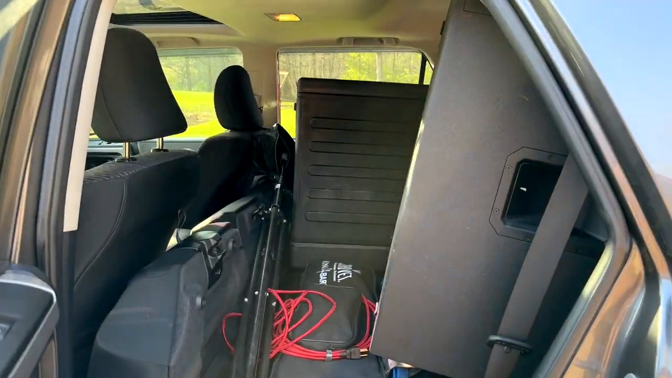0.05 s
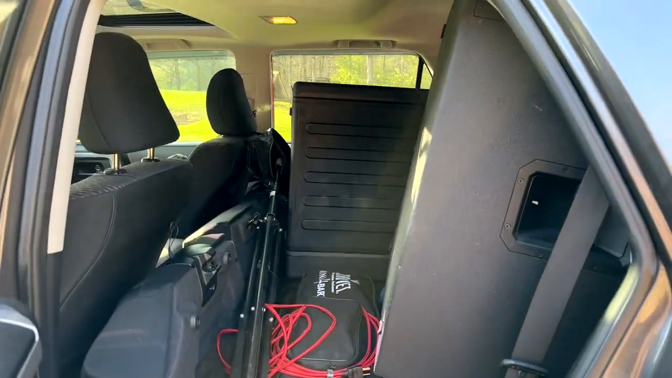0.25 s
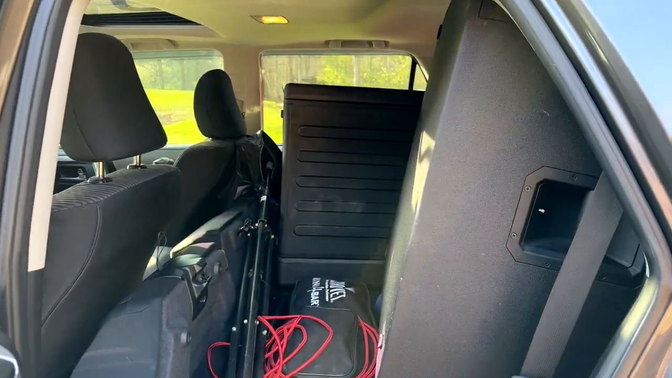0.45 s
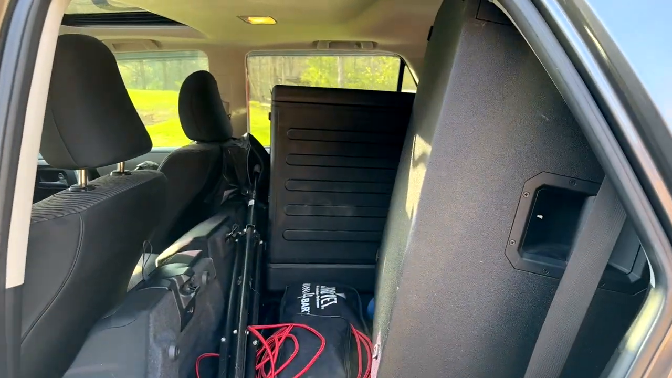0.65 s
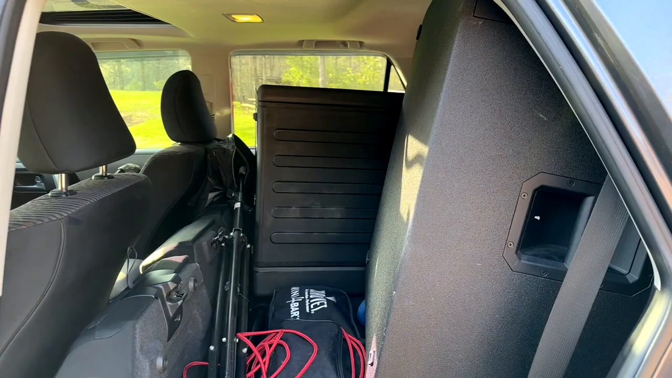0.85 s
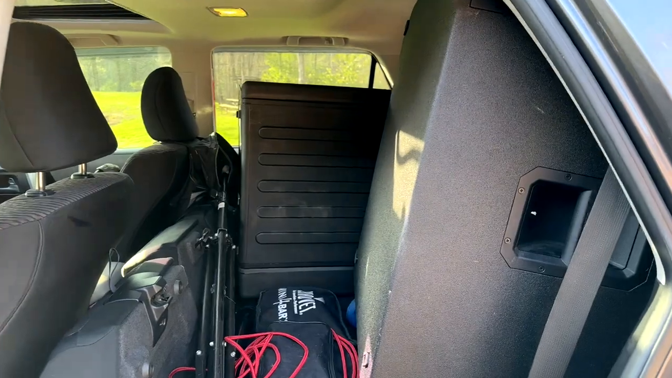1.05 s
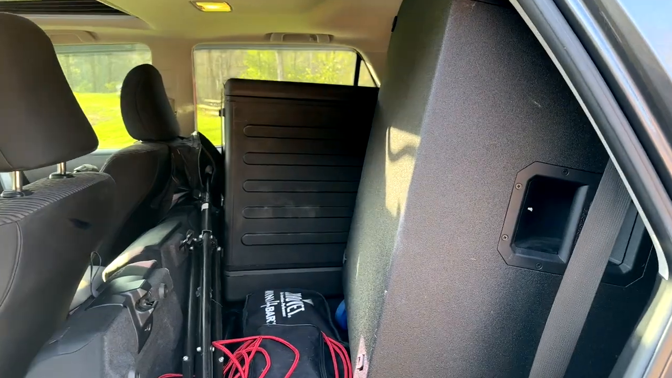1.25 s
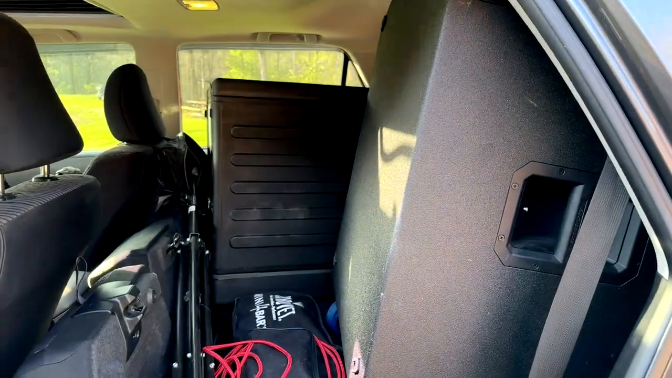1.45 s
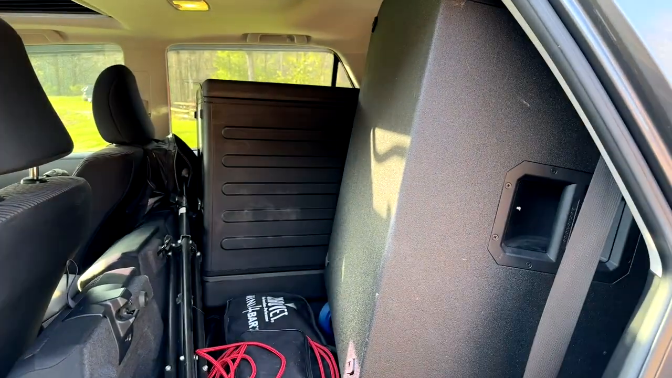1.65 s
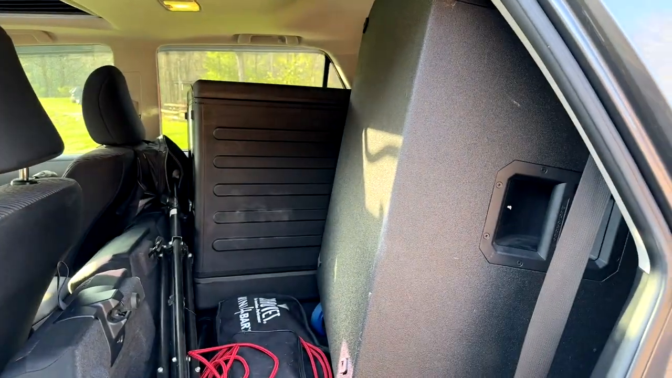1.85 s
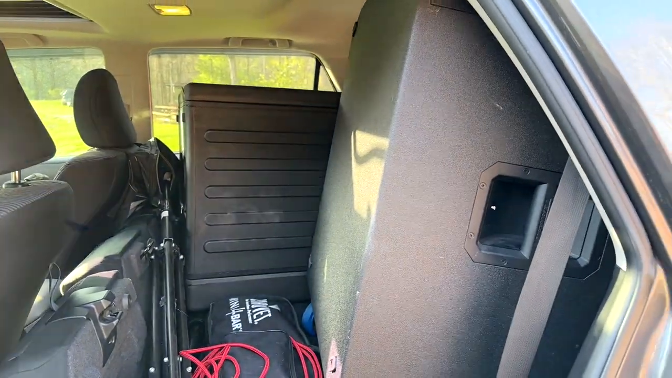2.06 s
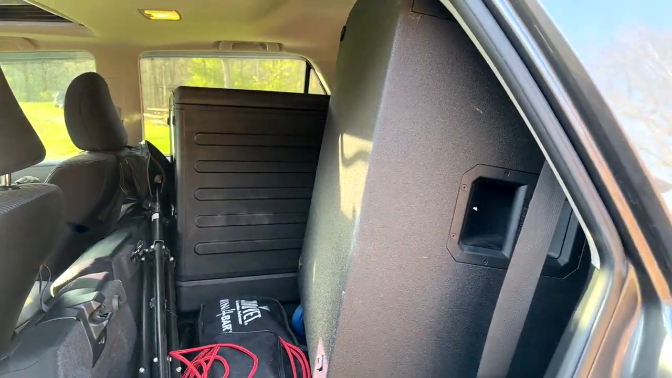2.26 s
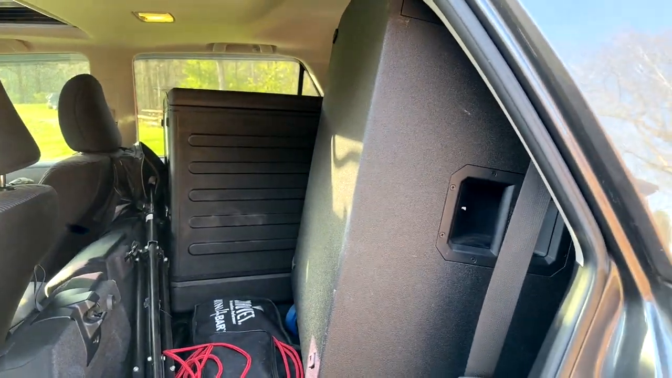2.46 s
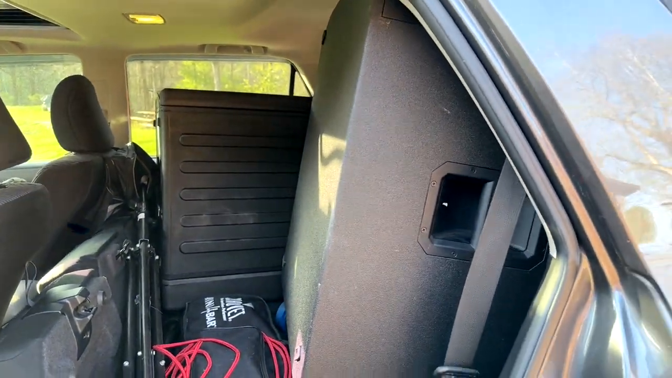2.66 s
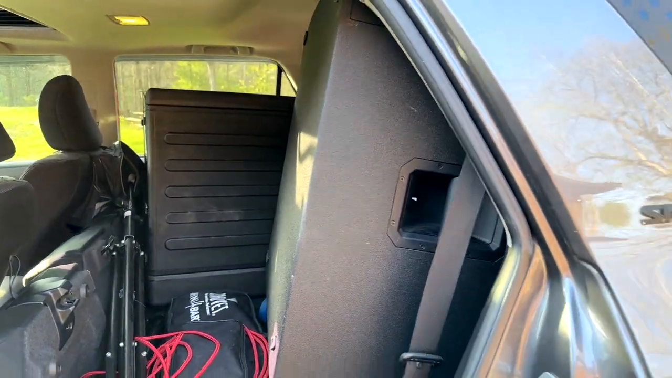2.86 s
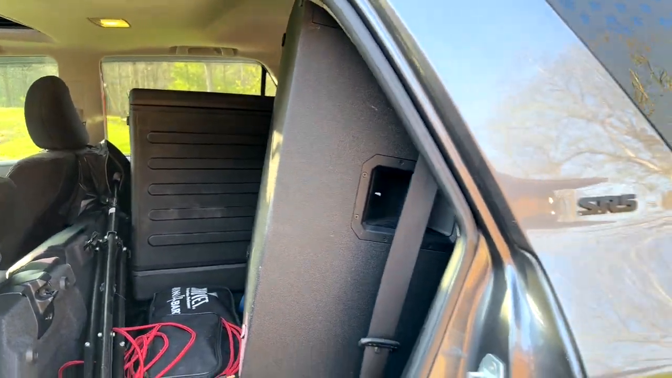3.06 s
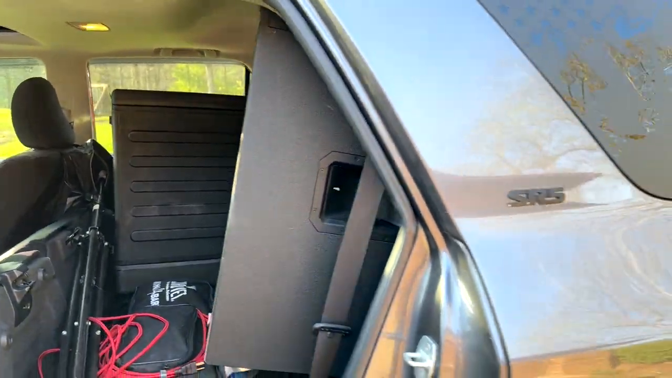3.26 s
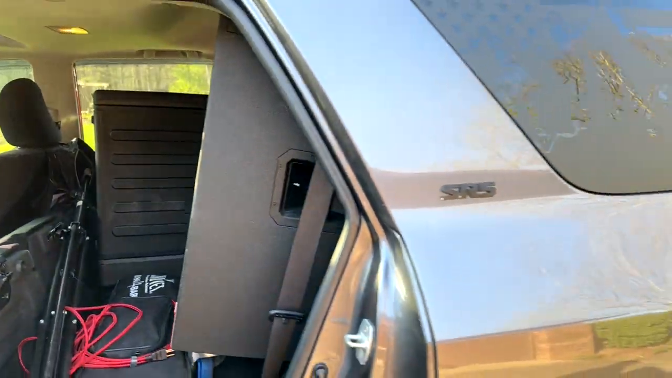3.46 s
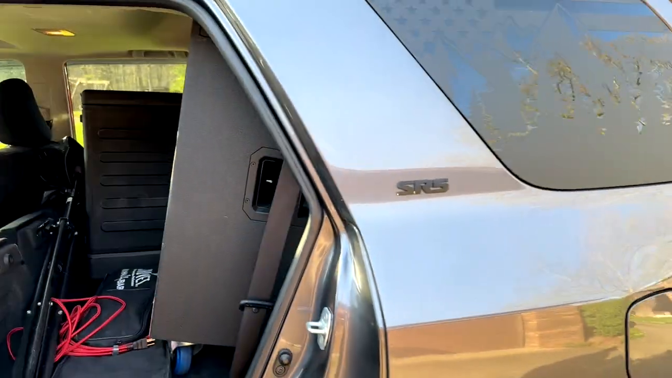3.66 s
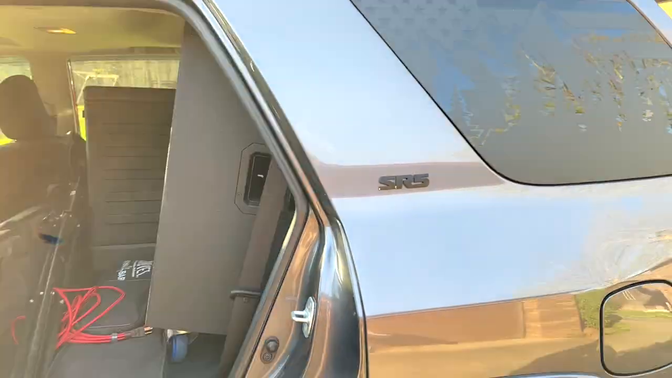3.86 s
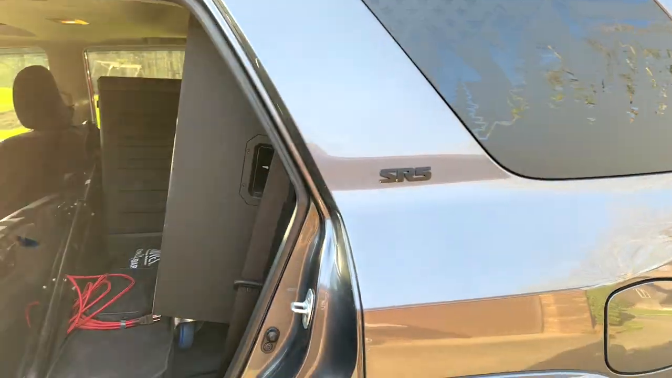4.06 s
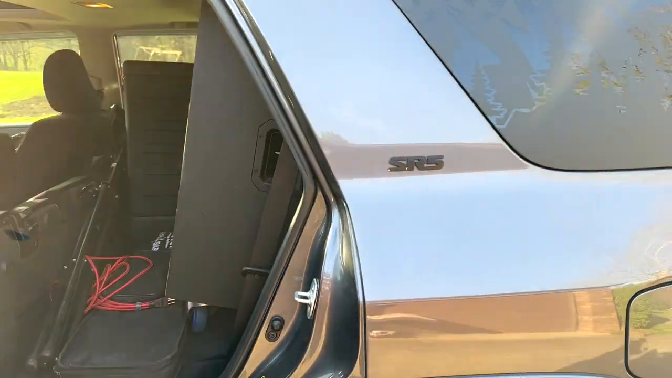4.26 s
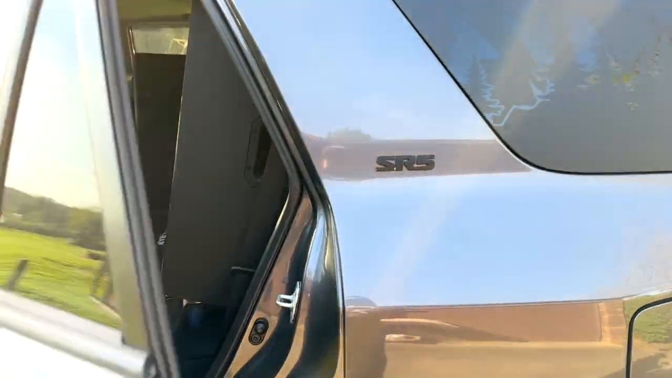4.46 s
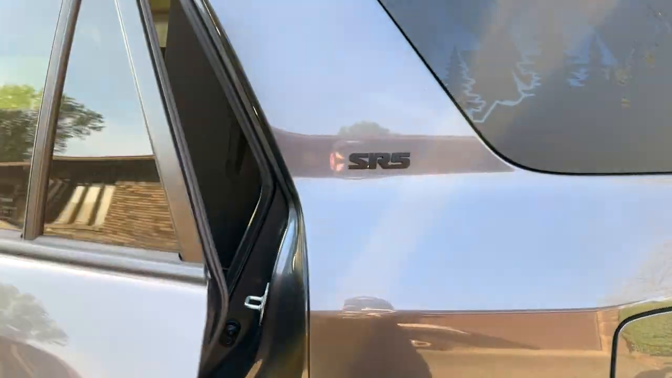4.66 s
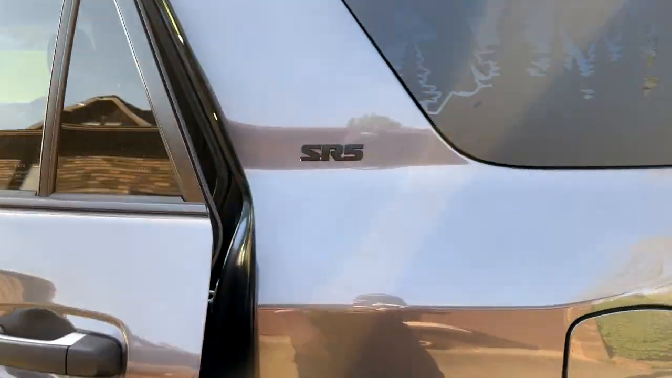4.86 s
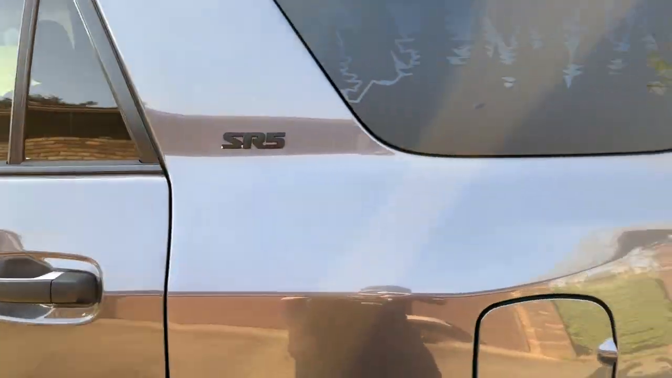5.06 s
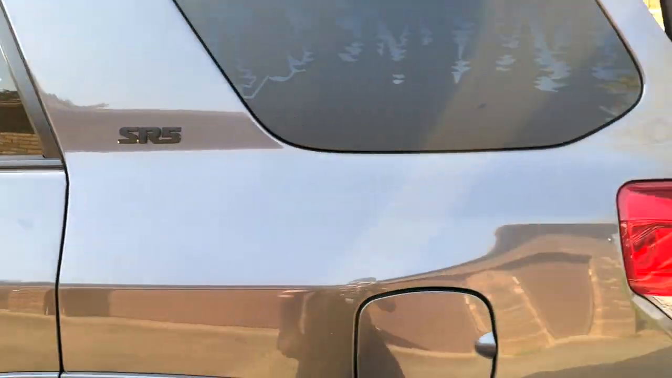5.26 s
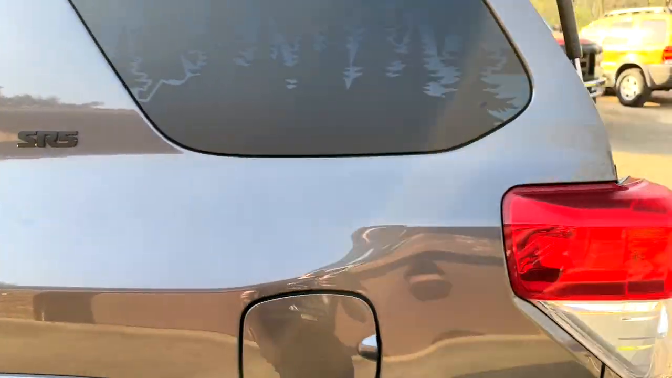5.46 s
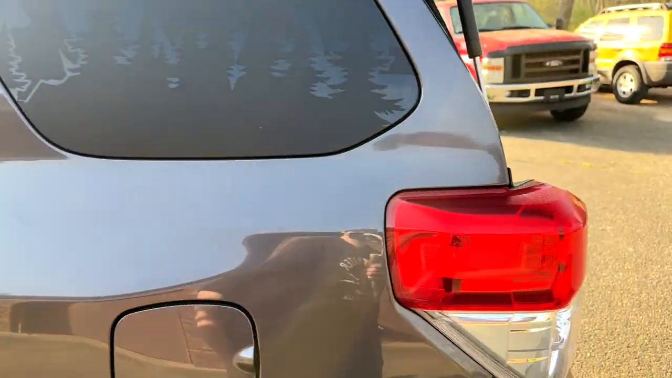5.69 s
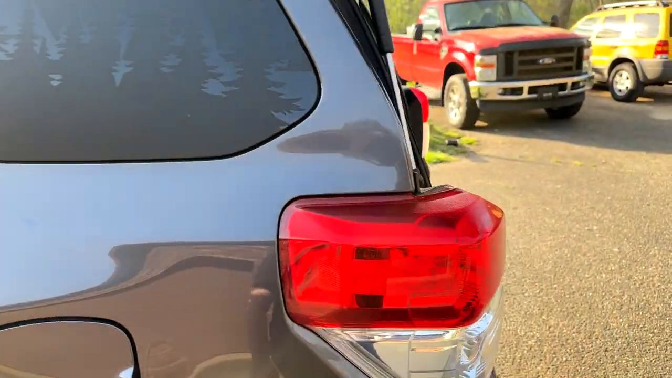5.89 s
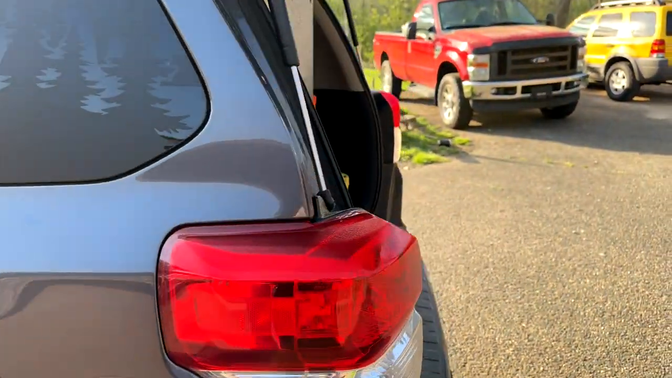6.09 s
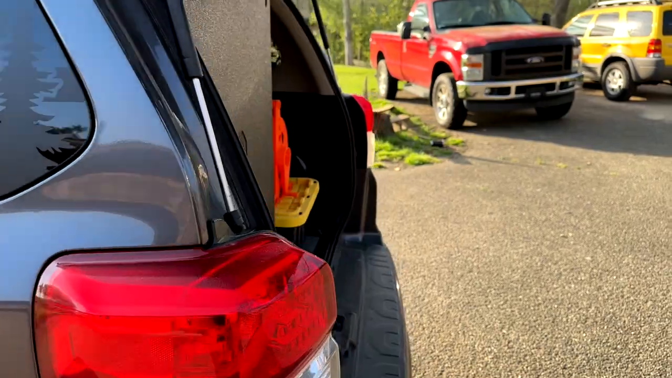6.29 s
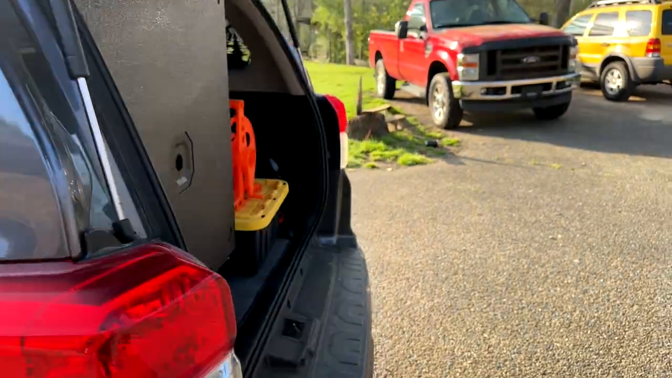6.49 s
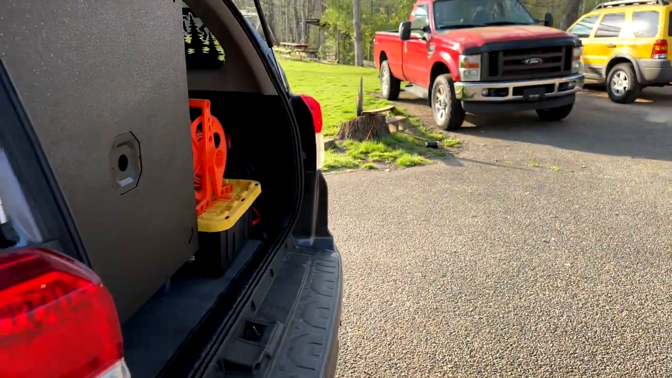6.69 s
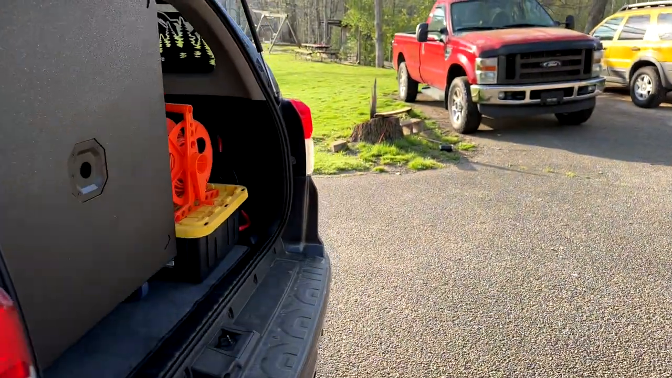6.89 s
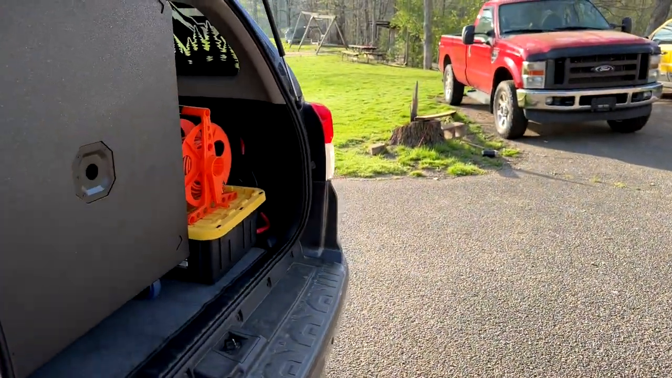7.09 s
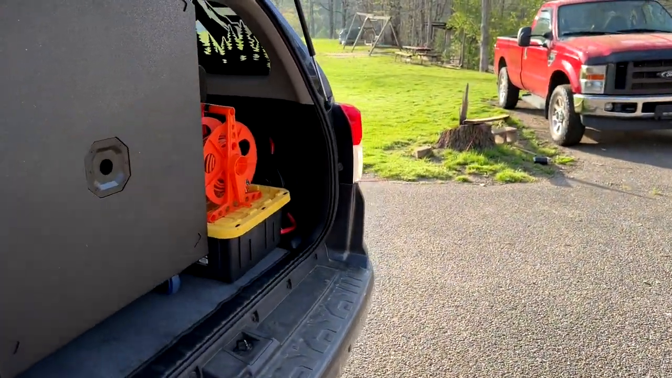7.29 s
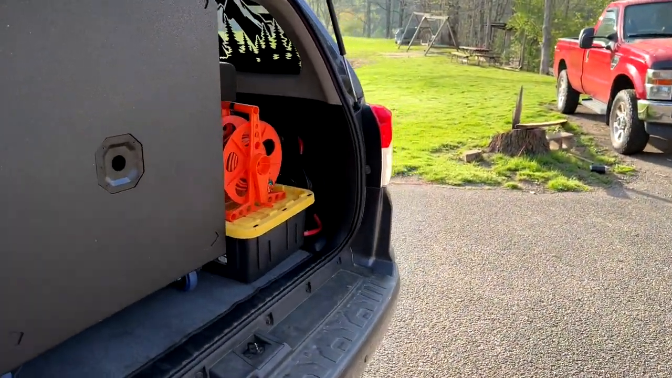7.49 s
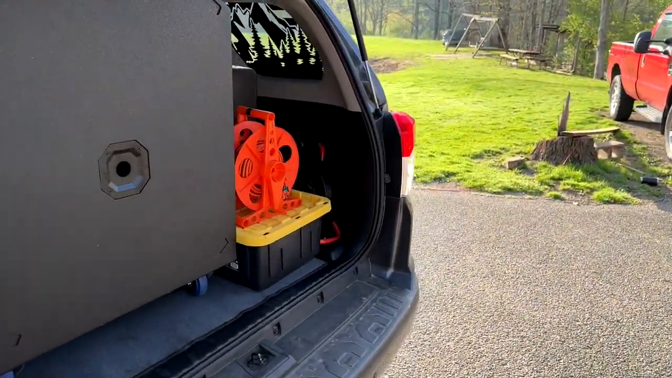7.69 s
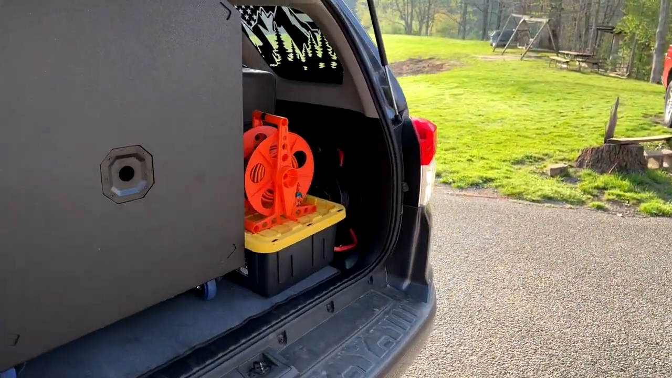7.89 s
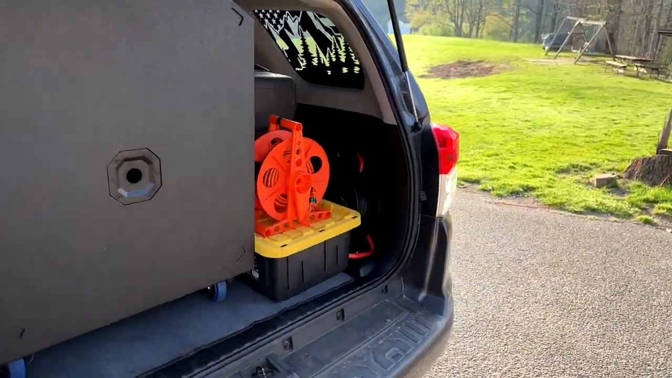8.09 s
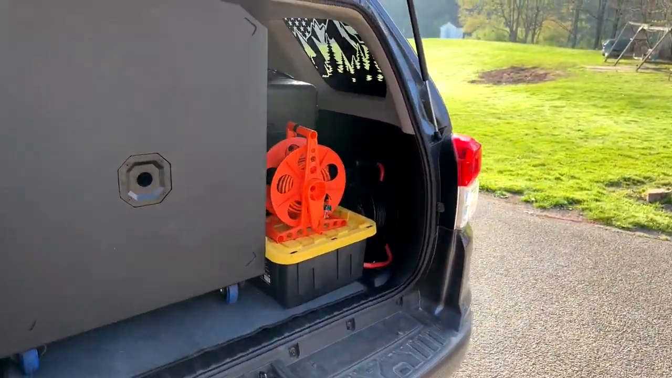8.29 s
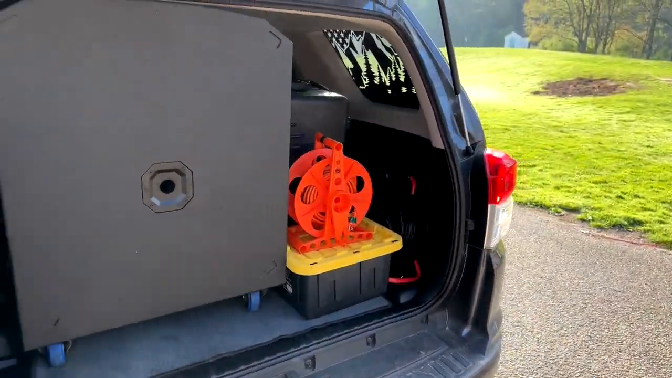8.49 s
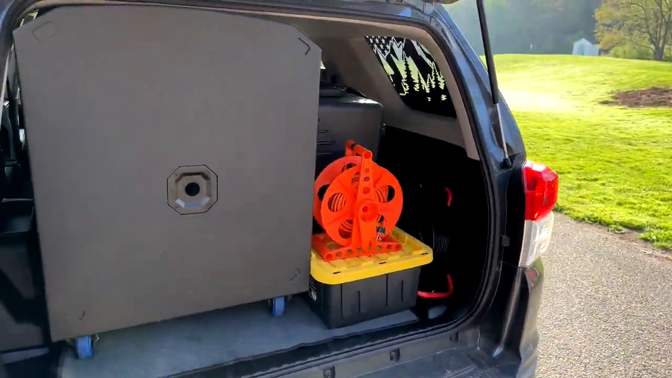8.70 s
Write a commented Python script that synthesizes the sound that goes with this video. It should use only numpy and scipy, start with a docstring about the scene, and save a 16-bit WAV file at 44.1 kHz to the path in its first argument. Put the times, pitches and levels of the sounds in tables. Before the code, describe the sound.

Close hand-held phone pickup outdoors. Faint distant birds, low hum and soft hiss come first, with sparse shoe scuffs and small ticks. A rapid down-slurred trill runs up to and just past a single loud car door slam, whose quick cluster of latch clicks and panel knocks lands with a bassy thump and short ring. Then gritty steps, fabric rustle and thin far whistles fill the quiet.

```python
"""On a driveway, a heavy car door is pushed shut an arm's length from a hand-held phone.
Nine blows on latch, frame and seals ring the panels as fading sine waves, and the cabin air booms.
Shoes scuff, tick and thud on gritty asphalt, and clothes swish, made from short or swelling noise.
Birds trill, call and whistle as unsteady tones with harmonics, blurred by reflections.
Behind them lie a distant rumble with hiss, a low hum, a drone and a faint whine."""
import sys
import numpy as np
from scipy import signal
from scipy.fft import irfft
from scipy.io import wavfile
from scipy.ndimage import map_coordinates

SR = 44100
rng = np.random.default_rng(int(sys.argv[2]) if len(sys.argv) > 2 else 0)


def int16_out(signal):
    """Quantize to a 16-bit WAV file."""
    q = np.round(np.clip(np.atleast_2d(signal).T, -1, 1) * 32767)
    wavfile.write(sys.argv[1], SR, q.astype(np.int16))


N = 385434
TIME = np.arange(N) / SR


def undb(db):
    """Turn decibels into a plain gain."""
    return 10 ** (np.asarray(db) / 20)


def unit(x):
    """Scale a sound to an average (rms) strength of 1."""
    return x / np.sqrt(np.mean(x ** 2))


def colour(points, hz):
    """Read the gain at each frequency from an outline of (pitch_hz, level_db) points."""
    point_hz, point_db = np.transpose(points)
    return undb(np.interp(np.log(hz + 1), np.log(point_hz), point_db))


def noise(points, size, width_hz=1700):
    """Coloured stereo noise of rms 1; the channels are alike in the bass and part in the treble."""
    hz = np.fft.rfftfreq(size, 1 / SR)
    mid, side = np.exp(2j * np.pi * rng.random((2, len(hz))))
    side = side * 0.89 * (hz / (hz + width_hz)) ** 0.48
    left_right = np.array([mid + side, mid - side])
    return unit(irfft(left_right * colour(points, hz), size))


def walk(rate, size):
    """Smooth random wander of spread near 1, with `rate` random points per second."""
    steps = np.arange(size) * rate / SR
    points = rng.standard_normal(int(steps[-1]) + 2)
    return map_coordinates(points, [steps], order=2, mode="nearest")


def fade(t, t60):
    """Die away evenly, by 60 dB in t60 seconds."""
    return np.exp(-np.log(1000) * t / t60)


def pan(x, left_db):
    """Lean a sound to the left: left_db is how much louder the left gets than the right."""
    return x * undb(np.array([[left_db], [-left_db]]) / 2)


def add(out, start, x):
    """Mix x in from the given time in seconds."""
    i = min(max(int(start * SR), 0), N)
    out[..., i:i + x.shape[-1]] += x[..., :N - i]


def echo(x, t60, delay, points):
    """Diffuse reflections from trees and house walls: a fading noise that smears the sound."""
    t = TIME[:SR]
    build_up = 1 - np.exp(-t / delay)
    response = noise(points, size=SR, width_hz=90) * fade(t, t60) * build_up
    return signal.fftconvolve(np.atleast_2d(x), unit(response) / np.sqrt(SR), axes=1)[:, :N]


# Blows of the door on latch, frame and seals: start_s [s], panel_ring_db [dB],
# push_hz [Hz] (pitch that the blow excites most), clack_db [dB], steel_snap_db [dB]
DOOR_BLOWS = [(5.0163, -21, 632, -10, -29), (5.0257, -47, 600, -17, -45.5), (5.0328, -39, 1100, -15, -17),
              (5.0363, -32.5, 907, -13.5, -13.5), (5.0397, -23.5, 495, -7.5, -19),
              (5.0500, -24.5, 249, -29, -36), (5.0720, -30.5, 330, -19, -34), (5.1060, -32, 260, -33, -41),
              (5.2370, -58, 450, -36.5, -48)]
# Ringing tones of the door panels and frame: pitch_hz [Hz], level_db [dB], t60_s [s]
PANEL_MODES = [(216, -5.5, 0.36), (249.9, 2.5, 0.46), (300.5, -7.5, 0.28), (337.3, -4.5, 0.49),
               (427, -0.5, 0.25), (470, -3, 0.12), (604, -9, 0.23), (638, -11, 0.067), (783, -8, .17),
               (833, 0, 0.17), (864, -9, 0.13), (1000, -14, 0.086), (990, -15.5, 0.14), (1080, -12, 0.06),
               (1230, -15, .17), (1480, -2, 0.14), (1953, 1.5, .16), (2420, -1, 0.15)]
# Colour of the dull contact noise: pitch_hz [Hz], level_db [dB per Hz]
CLACK_COLOUR = [(100, -19), (250, -1), (480, 0.5), (750, 2), (1000, 0.5), (1400, -10), (1700, -20),
                (3000, -33), (7000, -36), (15000, -46.5)]
# Colour of the sharp contact noise, also used for ticks: pitch_hz [Hz], level_db [dB per Hz]
SNAP_COLOUR = [(500, -16), (1400, 0), (2500, 1), (4600, -5), (6500, -9.5), (9000, -17), (14500, -21),
               (16000, -42.5)]


def door():
    """Each blow rings the panel modes near its own pitch, with a clack and a snap of the steel latch."""
    out, t = np.zeros((2, N)), TIME[:SR // 2]
    hz, mode_db, t60 = np.transpose(PANEL_MODES)[:, :, None]
    signs = (-1) ** np.arange(len(PANEL_MODES))[:, None]
    modes = signs * undb(mode_db) * fade(t, t60) * np.sin(2 * np.pi * hz * t)
    for start, ring_db, push_hz, clack_db, snap_db in DOOR_BLOWS:
        reach = 1 / np.sqrt(1 + (0.82 * (hz / push_hz - push_hz / hz)) ** 2)
        # a soft, low push takes longer to build up
        ring = (reach * modes).sum(axis=0) * (1 - np.exp(-t * push_hz / 0.28))
        clack = noise(CLACK_COLOUR, size=len(t)) * (fade(t, 0.024) + undb(-18) * fade(t, 0.24))
        snap = noise(SNAP_COLOUR, size=len(t)) * (fade(t, 0.012) + undb(-13.0) * fade(t, 0.15))
        contact = pan(undb(clack_db) * clack, 4.1) + pan(undb(snap_db) * snap, 4.5)
        contact = contact * (1 - np.exp(-t / 0.00064))
        # the door is on the left, so its ring reaches the right channel later
        left_right = np.array([ring, np.interp(t - .00015, t, ring)])
        add(out, start, pan(undb(ring_db) * left_right, 2.7) + contact)
    reflections = echo(out, 1.0, 0.022, [(60, -2.5), (300, -8.0), (1200, -3.5), (6000, -18.0)])
    return out + undb(-35.0) * reflections


# Cabin air pumped by the closing door: it swells, holds while its pitch climbs, then drops to a faint ring
BOOM_S, BOOM_DB, BOOM_HZ, BOOM_CLIMB_HZ_PER_S = 5.033, -8.5, 52.9, 100
BOOM_ATTACK_S, BOOM_HOLD_S, BOOM_SAG_DB_PER_S, BOOM_RELEASE_T60_S = .027, 0.1064, 24, .05
AFTER_RING_DB, AFTER_RING_T60_S = -18, 0.91


def boom_shape(t):
    """Attack, sagging hold and quick release of the cabin boom, over a faint after-ring."""
    since_hold = np.maximum(t - BOOM_HOLD_S, 0)
    attack = np.minimum(t / BOOM_ATTACK_S, 1) ** 3
    held = undb(-BOOM_SAG_DB_PER_S * t) * fade(since_hold, BOOM_RELEASE_T60_S)
    after_ring = undb(AFTER_RING_DB) * fade(since_hold, AFTER_RING_T60_S)
    return attack * np.maximum(held, after_ring)


SEAL_S = 5.044  # the door lands on its seals
# The whole door skin flexing as it lands: pitch_hz [Hz], level_db [dB], t60_s [s], rise_s [s]
DOOR_SKIN = [(120.4, -4.5, 0.2, 0.012), (172, -3.5, 0.152, 0.0063)]


def cabin():
    """The door skin flexes and the trapped air booms, then sinks into the rumble of the rocking body."""
    out, t = np.zeros((2, N)), TIME[:SR]
    climb_hz = BOOM_CLIMB_HZ_PER_S * np.minimum(t, BOOM_HOLD_S)
    # after the hold the pitch sinks back
    hz = BOOM_HZ + climb_hz * fade(np.maximum(t - BOOM_HOLD_S, 0), 0.45)
    boom = boom_shape(t) * np.sin(2 * np.pi * np.cumsum(hz) / SR)
    add(out, BOOM_S, undb(BOOM_DB) * boom)
    rumble_colour = [(15, -11.5), (35, 4.5), (60, 3.0), (100, -5), (400, -37), (1500, -90.5)]
    rumble = noise(rumble_colour, size=SR, width_hz=600)
    add(out, SEAL_S, undb(-25) * rumble * fade(t, 1.31) * (1 - np.exp(-t / .01)))
    for skin_hz, skin_db, t60, rise in DOOR_SKIN:
        swing = np.sin(2 * np.pi * skin_hz * t) * fade(t, t60) * (1 - np.exp(-(t / rise) ** 2))
        add(out, SEAL_S, pan(undb(skin_db) * swing, 1.0))
    return out


def scuff(hz, length):
    """Grit grinds under a sole while one slipping stone knocks at its own pitch."""
    t = TIME[:SR // 4]
    grit_colour = [(hz / 4, -22), (hz * 0.33, -5), (hz, 0), (hz * 2.12, -15), (hz * 8, -32)]
    grit = noise(grit_colour, size=len(t))
    press = (1 - np.exp(-t / 0.00022)) * (np.exp(-t / length) + undb(-10.5) * fade(t, 0.19))
    knock = np.sin(2 * np.pi * hz * t) * t / length * np.exp(1 - 2 * t / length)
    return pan(grit * press + undb(2.0) * knock, 0.78)


SCUFF_S = 0.0049  # fading time of a scuff
# Loose grains that slip after each scuff: mean delay, level against the scuff
GRAIN_DELAY_S, GRAIN_DB = .04, -11
# Soles scuffing on grit: start_s [s], level_db [dB], pitch_hz [Hz] (centre)
SOLE_SCUFFS = [(.621, -49.5, 1060), (0.991, -42.5, 1870), (3.524, -39, 776), (3.539, -34.5, 970),
               (4.522, -38.5, 1130), (5.908, -36.5, 1045), (5.966, -39, 1330), (6.033, -36, 1410),
               (6.046, -32.5, 1000), (6.089, -45, 1440), (6.187, -44.5, 1400), (6.262, -40.5, 1370),
               (6.58, -39, 900), (6.656, -40.5, 1170), (6.931, -45, 1030), (7.416, -35.5, 930),
               (7.442, -36, 1024), (8.701, -42.5, 605)]
# Small sharp ticks: start_s [s], level_db [dB]
SHARP_TICKS = [(.993, -52), (3.412, -30.5), (3.438, -31.5), (4.347, -41), (6.091, -38.5), (6.265, -50),
               (6.655, -39.5)]
# Soft footfalls and bumps: start_s [s], level_db [dB], pitch_hz [Hz] (centre)
SOFT_THUDS = [(1.861, -33.5, 104), (1.904, -38, 81.5), (2.908, -46.5, 70), (4.46, -32.5, 60),
              (4.53, -41, 129), (5.61, -40, 56.5), (6.589, -42, 129), (8.69, -41.5, 134)]


def shoes():
    """Scuffs that each loosen two grains, hard little ticks and dull footfalls, all from short noise."""
    out, t = np.zeros((2, N)), TIME[:SR // 4]
    for start, db, hz in SOLE_SCUFFS:
        add(out, start, undb(db) * scuff(hz, SCUFF_S))
        for wait, pitch in rng.random((2, 2)):
            # up to half an octave above or below the scuff
            grain = scuff(hz * 2 ** (pitch - .5), SCUFF_S / 2)
            add(out, start + 2 * GRAIN_DELAY_S * wait, undb(db + GRAIN_DB) * grain)
    for start, db in SHARP_TICKS:
        tick = noise(SNAP_COLOUR, size=len(t)) * fade(t, 0.014) * (1 - np.exp(-t / 0.00013))
        add(out, start, undb(db) * tick)
    for start, db, hz in SOFT_THUDS:
        thud_colour = [(hz / 3, -14), (hz, 0), (hz * 3, -13), (hz * 6, -36), (hz * 40, -70)]
        thud = noise(thud_colour, size=len(t)) * fade(t, 0.3) * (1 - np.exp(-t / 0.0057))
        add(out, start, undb(db) * thud)
    return out


def syrinx(hz, throat, rough, flutter_hz, count):
    """A bird's voice: harmonics on an unsteady pitch, shaped by its throat."""
    unsteady_hz = hz * (1 + rough * walk(flutter_hz, len(hz)))
    phase = 2 * np.pi * np.cumsum(unsteady_hz) / SR
    return sum(colour(throat, k * hz) * np.sin(k * phase) for k in range(1, count + 1))


# The trill settles to a steady beat: first note, final spacing, time lost in the run-up,
# notes it takes to settle, notes in all
TRILL_S, TRILL_PERIOD_S, RUN_UP_S, RUN_UP_NOTES, TRILL_COUNT = 3.3165, .0748, .0885, 3.43, 33
# Every note arches up and slurs down; it is loudest on the way down
NOTE_LOW_HZ, NOTE_TOP_HZ, ARCH_LEAD_S, ARCH_WIDTH_S = 949, 1476, .017, .015
NOTE_ATTACK_S, NOTE_RELEASE_S, NOTE_SCATTER_DB = .024, 0.016, 1.06
# Level of the trill over time: time_s [s], level_db [dB]
TRILL_LOUDNESS = [(3.33, -52), (3.6, -36.5), (5.0, -35), (5.15, -47.5), (5.58, -41), (5.8, -42.5)]
# Throat of the trilling bird: pitch_hz [Hz], level_db [dB]
TRILLER_THROAT = [(900, -19.5), (1500, -8.5), (1750, -7.5), (2150, -1), (2800, -11), (3400, -26.5),
                  (4900, -29.5), (6500, -16), (8000, -48.5)]


def trill():
    """A fast run of raspy, down-slurred notes that speeds up to a steady beat."""
    out, k = np.zeros((2, N)), np.arange(TRILL_COUNT)
    peaks = TRILL_S + TRILL_PERIOD_S * k + RUN_UP_S * (1 - np.exp(-k / RUN_UP_NOTES))
    t = np.arange(-SR // 20, SR // 20) / SR
    bend = np.exp(-((t + ARCH_LEAD_S) / ARCH_WIDTH_S) ** 2)
    arch = NOTE_LOW_HZ + (NOTE_TOP_HZ - NOTE_LOW_HZ) * bend
    swell = np.exp(-(t / np.where(t < 0, NOTE_ATTACK_S, NOTE_RELEASE_S)) ** 2)
    for peak in peaks:
        # no two notes take quite the same path
        pitch = arch * (1 + .035 * walk(60, len(t)))
        tone = syrinx(pitch, TRILLER_THROAT, rough=.034, flutter_hz=700, count=7)
        # the right channel hears the tone slightly later
        left_right = np.array([tone, np.interp(t - .00009, t, tone)])
        rasp = undb(-8.5) * noise(TRILLER_THROAT, size=len(t))
        db = np.interp(peak, *np.transpose(TRILL_LOUDNESS)) + NOTE_SCATTER_DB * rng.standard_normal()
        add(out, peak + t[0], (left_right + rasp) * swell * undb(db))
    return out + undb(-7) * echo(out, .3, .006, [(1000, 0), (8000, -2)])


# Throat of the calling birds: pitch_hz [Hz], level_db [dB]
CALLER_THROAT = [(900, -43), (1800, -14), (2750, -5), (3300, -5), (3700, -16.5), (4500, -22), (5300, -14),
                 (6500, -24), (11000, -46)]
# Harsh falling calls: start_s [s], length_s [s], first_hz [Hz], last_hz [Hz], level_db [dB],
# roughness [share of the pitch], brightness [dB per octave]
HARSH_CALLS = [(1.621, 0.26, 930.3, 868, -46, 0.009, -5.5), (2.885, 0.22, 944, 906, -57, 0.0055, -0.5),
               (3.318, 0.28, 853, 776, -48, 0.019, 5), (4.56, 0.3, 929, 877.5, -45.5, .005, -1),
               (8.003, .31, 856, 780, -50, 0.033, 3)]
# Far whistles and chirps: start_s [s], length_s [s], first_hz [Hz], last_hz [Hz], level_db [dB]
FAR_WHISTLES = [(0.472, 0.095, 3750, 3300, -57.5), (.78, 0.093, 3540, 3290, -57),
                (.87, .12, 3196, 3140, -56), (1.362, .099, 4630, 4480, -62),
                (2.215, .14, 3260, 3260, -56.5), (6.922, 0.096, 3720, 3370, -58.5),
                (7.392, 0.035, 4330, 4700, -56), (7.62, .035, 4800, 4300, -56),
                (7.811, .04, 2224, 2460, -50.5), (7.878, .037, 4270, 4670, -52),
                (7.882, 0.27, 2874, 2810, -56), (8.169, 0.13, 3280, 3060, -55),
                (8.198, .47, 2915, 2830, -56.5)]


def far_birds():
    """Harsh calls with many harmonics and thin one-tone whistles, smeared by the trees."""
    out = np.zeros(N)
    for start, length, first_hz, last_hz, db, rough, bright in HARSH_CALLS:
        progress = np.linspace(0, 1, int(length * SR))
        throat = [(hz, gain + bright * np.log2(hz / 2800)) for hz, gain in CALLER_THROAT]
        pitch = first_hz + (last_hz - first_hz) * progress ** 1.1
        call = syrinx(pitch, throat, rough, flutter_hz=451.0, count=12)
        level = undb(db + 1.8 * walk(90, len(pitch)))
        add(out, start, level * call * signal.windows.tukey(len(pitch), .4))
    for start, length, first_hz, last_hz, db in FAR_WHISTLES:
        hz = np.linspace(first_hz, last_hz, int(length * SR))
        # the shorter the note, the buzzier it is
        rough = 0.016 + 0.0008 / length
        whistle = syrinx(hz, [(2000, 0), (5000, -0.52)], rough, flutter_hz=508, count=1)
        add(out, start, undb(db) * whistle * signal.windows.tukey(len(hz), .5))
    reflections = echo(out, 0.64, 0.003, [(1000, -0.43), (8000, -1.5)])
    return pan(out + undb(1) * reflections, 2.7)


def chorus():
    """Many small birds deep in the wood: their chirps arrive only as a blur of reflections."""
    out = np.zeros(N)
    for when, pitch, slur, size in rng.random((170, 4)):
        glide = 1 + np.linspace(0, .3, SR // 16) * (slur - .5)
        hz = (2500 + 1900 * pitch ** 2) * glide
        chirp = syrinx(hz, [(2000, 0), (5000, -0.5)], rough=0.036, flutter_hz=496, count=1)
        add(out, when * N / SR, undb(-64.5 + 7 * size) * chirp * np.hanning(len(hz)))
    return echo(out, 0.4, 0.022, [(1000, 0.0), (8000, 0)])


# One swish of sleeves and jacket for each step or reach: peak_s [s], half_length_s [s],
# rub_db [dB] (low), rustle_db [dB] (fine)
CLOTH_SWISHES = [(0.046, 0.21, -76, -66.5), (1.0, 0.2, -61.5, -78), (3.55, 0.27, -69, -58.5),
                 (4.157, 0.28, -51.5, -80), (4.57, 0.58, -49, -59), (5.295, 0.6, -60.5, -66.5),
                 (6.048, 0.4, -53.5, -60), (6.75, 0.26, -55, -60.5), (7.573, 0.3, -53.5, -57.5),
                 (8.31, 0.54, -57, -61.5)]
# Colour of the low rub: pitch_hz [Hz], level_db [dB per Hz]
RUB_COLOUR = [(50, 3), (130, -4), (320, -4.5), (600, -12), (1200, -14), (2500, -20), (6000, -37)]
# Colour of the fine rustle: pitch_hz [Hz], level_db [dB per Hz]
RUSTLE_COLOUR = [(500, 4), (1200, -3), (3000, 4), (6000, -20), (11000, -6), (15000, -29)]


def clothes():
    """Fabric rubs and rustles unevenly; each swish swells and dies away with the movement."""
    peak, half, rub_db, rustle_db = np.transpose(CLOTH_SWISHES)[:, :, None]
    swish = np.exp(-((TIME - peak) / half) ** 2)
    # overlapping swishes add up by their power
    rubbing = np.sqrt(((undb(rub_db) * swish) ** 2).sum(axis=0))
    rustling = np.sqrt(((undb(rustle_db) * swish) ** 2).sum(axis=0))
    rub = noise(RUB_COLOUR, size=N) * rubbing * undb(2.4 * walk(14, N))
    crackle_db = 2 * walk(25, N) + 3.1 * walk(400, N)
    rustle = noise(RUSTLE_COLOUR, size=N) * rustling * undb(crackle_db)
    return rub + rustle


# Colour of the outdoor rumble and microphone hiss: pitch_hz [Hz], level_db [dB per Hz]
AIR_COLOUR = [(20, -26), (45, -7), (70, 2.5), (120, -4), (200, -11), (380, -15), (700, -31), (1300, -32.5),
              (2800, -27.5), (4200, -32.5), (5200, -37), (7500, -29), (9000, -49), (15000, -47)]
# Level of a low drone that comes and goes: time_s [s], level_db [dB]
DRONE_LEVEL = [(0, -59), (.95, -52.5), (1.5, -61), (3.5, -70.5)]
# Middle pitches and levels; all but the whine waver around them
AIR_DB, HUM_HZ, HUM_DB, DRONE_HZ = -51, 67.7, -54, 207.3
WHINE_HZ, WHINE_PULSE_HZ, WHINE_DB = 11908, 60, -75.5


def outdoors():
    """Distant rumble with a wavering low hum and drone, hiss and a faint pulsing whine of the phone."""
    air = noise(AIR_COLOUR, size=N) * undb(AIR_DB + .5 * walk(11.0, N))
    hum = np.sin(2 * np.pi * np.cumsum(HUM_HZ + 2 * walk(25, N)) / SR)
    hum = hum * undb(HUM_DB + 5.6 * walk(18, N))
    drone = np.sin(2 * np.pi * np.cumsum(DRONE_HZ + 7 * walk(40, N)) / SR)
    drone = drone * undb(np.interp(TIME, *np.transpose(DRONE_LEVEL)) + 3.5 * walk(29, N))
    pulses = np.sin(np.pi * WHINE_PULSE_HZ * TIME) ** 2
    whine = np.sin(2 * np.pi * WHINE_HZ * TIME) * pulses * undb(WHINE_DB)
    return pan(air, 3.4) + hum + drone + whine


def scene():
    """Everything heard on the driveway, from the door to the background."""
    return door() + cabin() + shoes() + trill() + far_birds() + chorus() + clothes() + outdoors()


TOP_HZ = 15700  # highest pitch that the phone lets through


def record(dry):
    """The phone rounds the highest peaks and cuts the top."""
    rounded = dry / (1 + dry ** 6) ** (1 / 6)
    low_pass = signal.ellip(8, .2, 70, TOP_HZ, fs=SR, output="sos")
    return signal.sosfilt(low_pass, rounded)


dry = scene()
out = record(dry)
int16_out(out)
```